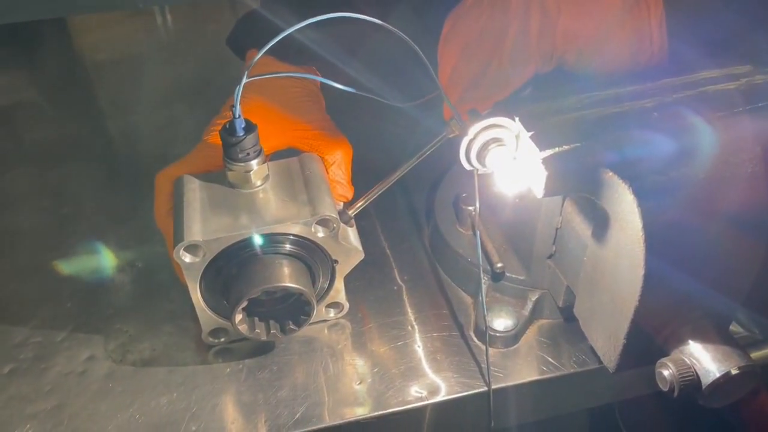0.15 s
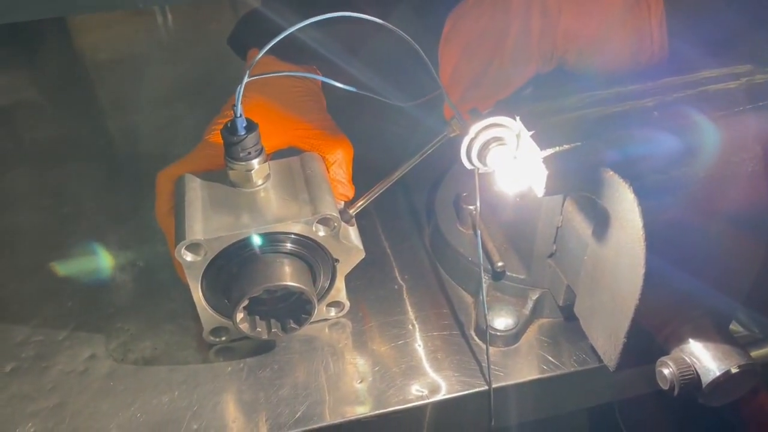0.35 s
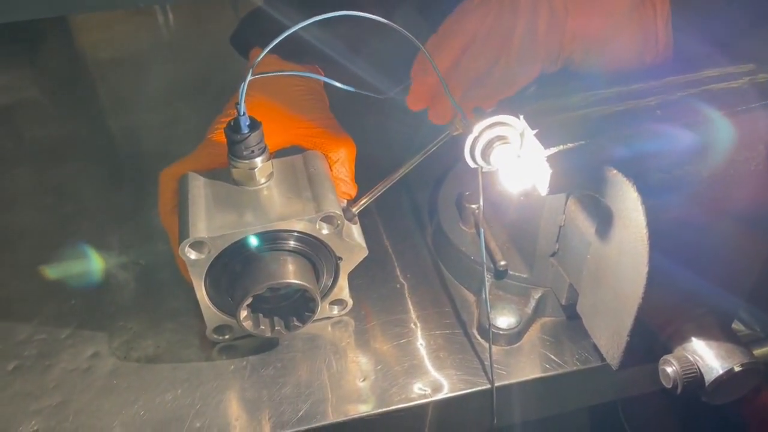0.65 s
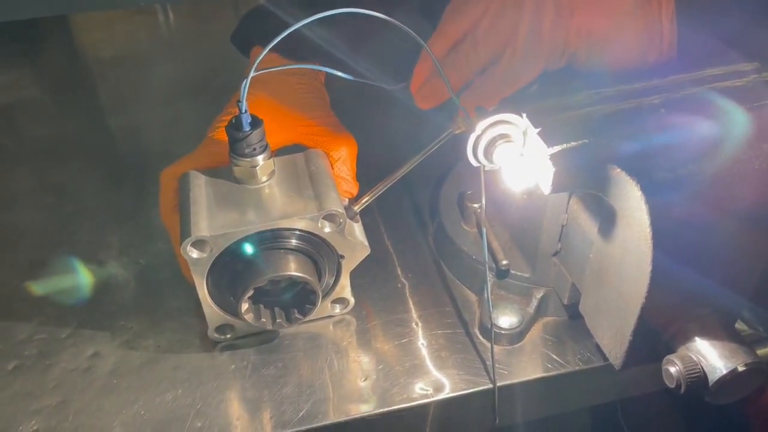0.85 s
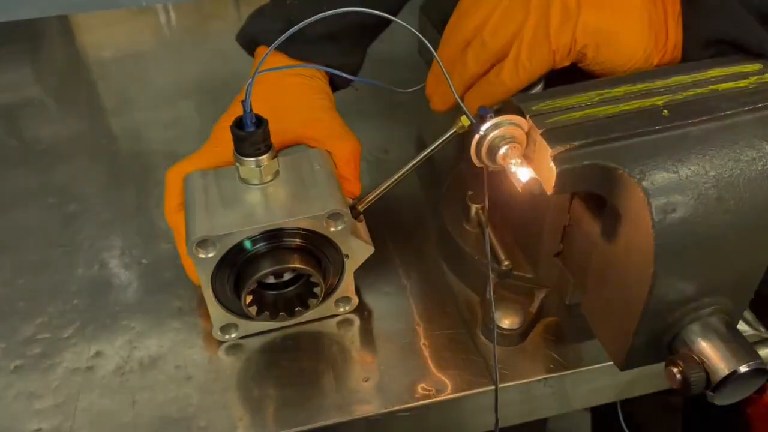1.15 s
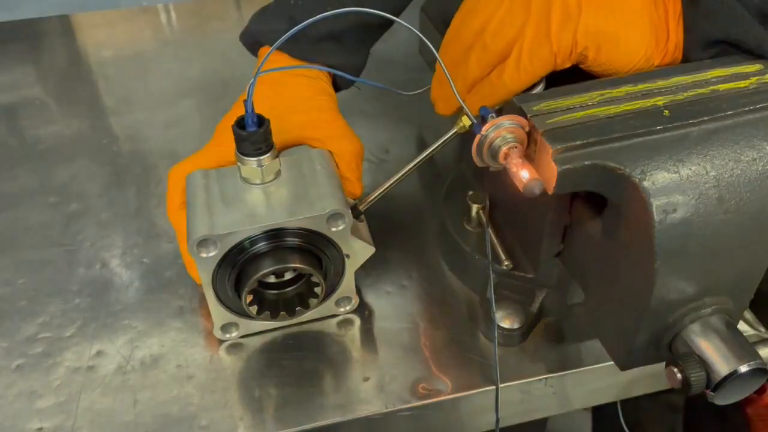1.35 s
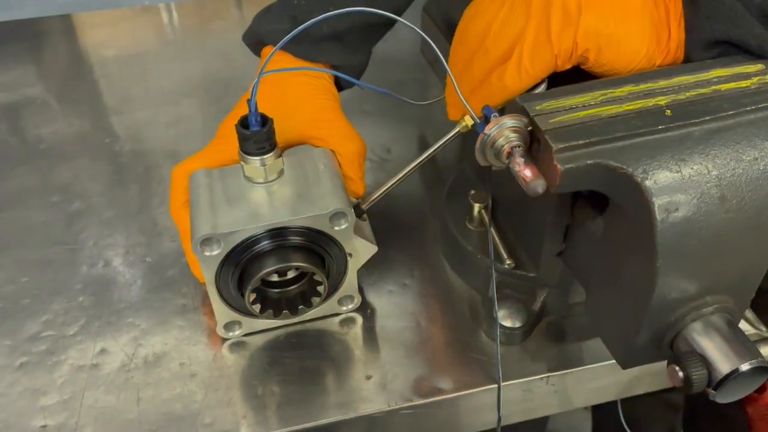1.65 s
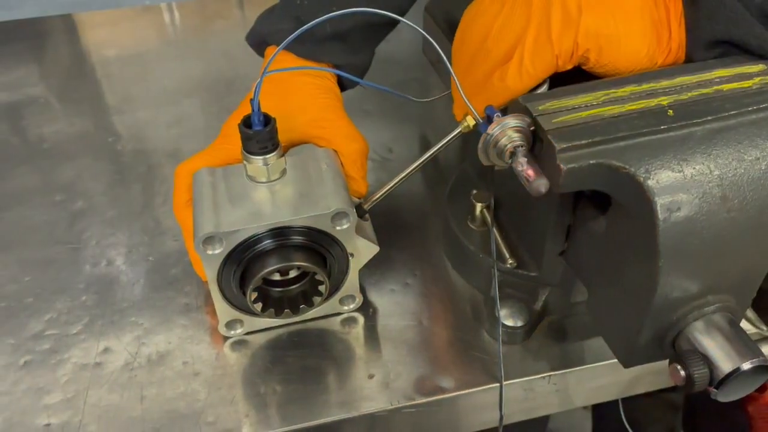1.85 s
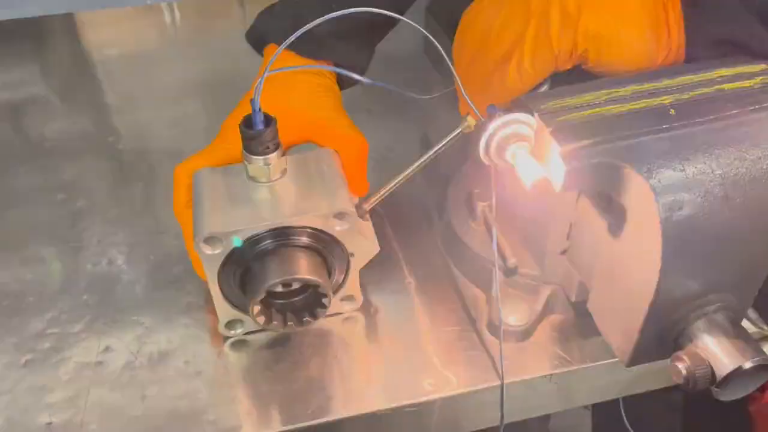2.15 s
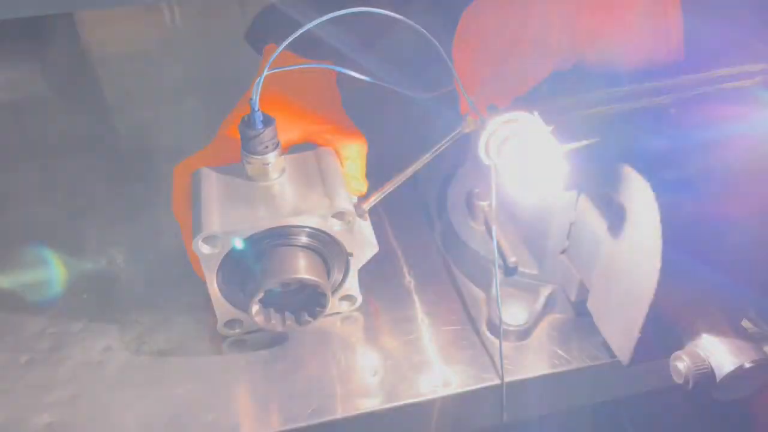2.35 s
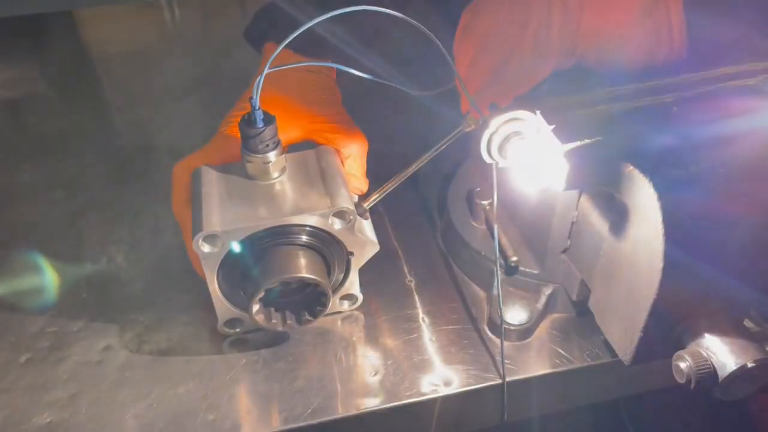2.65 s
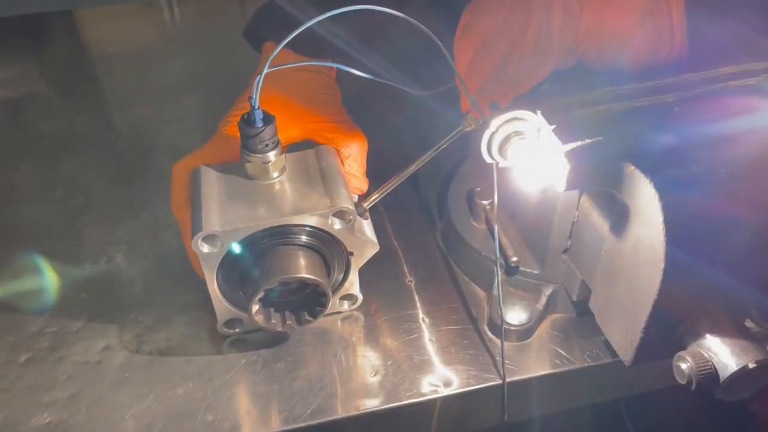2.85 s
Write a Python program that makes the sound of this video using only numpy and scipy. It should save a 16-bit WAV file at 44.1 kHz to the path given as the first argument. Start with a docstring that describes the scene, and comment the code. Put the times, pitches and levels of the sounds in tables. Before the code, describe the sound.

Bright air hiss fades to a thin leak, then returns suddenly with a knock and metallic clack

```python
"""On a workshop bench, compressed air hisses through a small steel actuator, dies away in two steps and
leaves a thin leak. After a second the valve reopens: the hiss bursts back, and at once the piston knocks,
rattles along its bore and hits its stop with a sharp click. The bench thuds; the workshop rumbles and
hums faintly. The hisses and rumble are coloured noise, the hum is a wandering sine, the slide is many tiny
slips, and the blows ring the resonances of metal and bench, with a burst of noise on the clicks."""
import sys
import numpy as np
from scipy import signal
from scipy.fft import rfft, irfft
from scipy.io import wavfile
from scipy.ndimage import uniform_filter1d

SR = 44100
rng = np.random.default_rng(int(sys.argv[2]) if len(sys.argv) > 2 else 0)


def waveform_to_disk(signal):
    """Save audio, clipped to [-1, 1], as 16-bit WAV at the path in sys.argv[1]."""
    frames = np.transpose(np.atleast_2d(signal))
    scaled = np.clip(frames, -1, 1) * 32767
    samples = np.round(scaled).astype(np.int16)
    wavfile.write(sys.argv[1], SR, samples)


N = 132300
TIME = np.arange(N) / SR  # seconds
HZ = np.maximum(np.arange(N // 2 + 1) * SR / N, 1)  # frequency of each step of the spectrum


def from_db(db):
    """Turn decibels into a gain."""
    return 10 ** (np.asarray(db) / 20)


def rms_one(x):
    """Scale a sound to an average (RMS) level of 1."""
    return x / np.sqrt(np.mean(x ** 2) + 1e-20)


def in_time(rows):
    """Join the rows of a curve by straight lines."""
    s, *columns = np.transpose(rows)
    return [np.interp(TIME, s, column) for column in columns]


def in_pitch(hz, column):
    """Join values by straight lines over the logarithm of frequency."""
    return np.interp(np.log(HZ), np.log(hz), column)


def low_pass(x, hz):
    """Cut the treble gently above a frequency."""
    return signal.sosfilt(signal.butter(2, min(hz, SR * .45), fs=SR, output="sos"), x)


def drift(rate):
    """Wander slowly at random, with spread 1; a higher rate in Hz wanders faster."""
    noise = rfft(rng.standard_normal(N))
    return rms_one(irfft(noise / (1 + (HZ / rate) ** 2), N))


def pair(table):
    """Gain and phase, by frequency, of a source in the left and right channels."""
    hz, _, pan_db, phase, _ = np.transpose(table)
    pan_db, phase = in_pitch(hz, pan_db), in_pitch(hz, phase)
    return np.array([from_db(pan_db / 2), from_db(-pan_db / 2) * np.exp(1j * phase)])


def turbulence(table):
    """Spectrum of a flow noise, partly shared by the two channels and partly separate."""
    hz, db, _, _, alike = np.transpose(table)
    db, alike = in_pitch(hz, db), in_pitch(hz, np.clip(alike, 0, 1))
    white = rfft(rng.standard_normal((3, N)))
    shared = np.sqrt(alike) * white[0]
    separate = np.sqrt(1 - alike) * white[1:]
    return (shared + separate) * from_db(db) * pair(table)


# echoes off bench and machine parts: longest delay in seconds, level of all together in dB
ECHO_S, ECHO_DB = .02, -12.5


def near_echoes(count):
    """Close reflections add to the direct sound and ripple the colour of a hiss."""
    delays = rng.uniform(ECHO_S / 10, ECHO_S, count)
    echoes = np.exp(-2j * np.pi * delays[:, None] * HZ).sum(axis=0)
    return 1 + from_db(ECHO_DB) / np.sqrt(count) * echoes


def impulses(rows):
    """Place one single-sample pulse for each row of time and level."""
    s, db = np.transpose(rows)
    return np.bincount((s * SR).astype(int), from_db(db), N)[:N] + 1e-18


def struck(rows, modes, vary_db):
    """Every blow rings all resonances of a body, each a little differently in level."""
    out, rows = 0, np.array(rows)
    for k, (hz, db, t60) in enumerate(modes):
        r = from_db(-60 / (t60 * SR))  # what is left of the ringing after one sample
        w = 2 * np.pi * hz / SR
        blow_db = rows[:, 1] + db + vary_db * rng.standard_normal(len(rows))
        blows = impulses(np.column_stack([rows[:, 0], blow_db]))
        ringing = signal.lfilter([0, np.sin(w)], [1, -2 * r * np.cos(w), r * r], blows)
        out = out + (-1) ** k * ringing  # neighbours start in opposite directions
    return out


def dying_noise(t60, channels):
    """Make a burst of noise that falls by 60 dB in t60 seconds."""
    t = TIME[:SR // 2]
    return rng.standard_normal((channels, len(t))) * np.exp(-np.log(1000) * t / t60)


# How loud the air jet is. Each row: time in seconds, level of the body of the hiss in dB,
# level of its treble in dB.
JET_LEVEL = [(0, -29, -30), (.44, -29, -29), (.58, -35.5, -35), (.71, -44.5, -40.5), (.98, -45.5, -37),
             (1.1, -67, -67), (2.05, -70, -55), (2.095, -30.5, -29.5), (2.2, -27, -27.5), (2.6, -28, -26.5),
             (2.69, -29.5, -29), (3.0, -30, -29.5)]
# Colour of the jet in the left and right channels. Each row: frequency in Hz, relative level per Hz in dB,
# left over right in dB, phase of the right in radians, likeness of the two from 0 to 1.
JET_COLOUR = [(600, -34.0, 1, -0.4, 0.54), (1450, -24.5, 0, 0.0, 0.96), (1900, -24.0, 1, -0.2, 0.76),
              (2850, -9.0, 0, -1.2, 0.76), (3500, -6.0, 1, -2.3, 0.79), (4000, -7.5, 3, -0.9, 0.65),
              (4500, -4.5, 3, -0.8, 0.77), (4850, -7.5, 3, -3.4, 0.3), (5250, 0.0, 4, -2.8, 0.84),
              (5800, -0.5, 5, -3.4, 0.88), (6350, -4.0, -5, -5.1, 0.78), (7000, -8.5, -4, -4.5, 0.69),
              (7500, -11.5, -3, -3.9, 0.66), (7850, -15.0, 0, -3.3, 0.84), (8600, -19.0, 0, -3.1, 0.97),
              (9100, -13.5, 0, -2.2, 0.66), (9900, -11.5, 0, -1.5, 0.72), (10550, -13.5, 0, -0.3, 0.75),
              (11300, -7.5, 0, 0.0, 0.97), (11900, -8.0, 0, 0.1, 0.96), (12800, -10.0, 0, 1.1, 0.74),
              (13500, -9.0, 0, 1.9, 0.77), (14650, -11.5, 0, 3.0, 0.95), (15400, -11.0, 0, 3.1, 0.97)]
# Half-whistling resonances of the air passages. Each row: frequency in Hz, width in Hz,
# lift in dB before the broad average is taken off.
PASSAGES = [(2960, 80, 3.5), (3265, 35, 4.5), (3440, 120, 2.5), (4070, 70, 4), (4486, 28, 10),
            (4548, 35, 4), (5200, 110, 2), (5325, 40, 5), (5800, 120, 1.5), (6260, 50, 3), (11485, 90, 3.5)]
TREBLE_FROM_HZ = 7140
JET_FLUTTER_DB, FLUTTER_HZ = 0.56, 37  # spread and rate of the unsteadiness


def jet():
    """Air rushes through the passages; as the flow drops the treble outlasts the body of the hiss."""
    lift_db = sum(db / (1 + (2 * (HZ - hz) / width) ** 2) for hz, width, db in PASSAGES)
    ripple_db = lift_db - uniform_filter1d(lift_db, size=1200)  # leaves the broad colour alone
    bass_cut = 1 / np.sqrt(1 + (300 / HZ) ** 4)
    air = turbulence(JET_COLOUR) * from_db(ripple_db) * near_echoes(count=16) * bass_cut
    body_share = 1 / (1 + (HZ / TREBLE_FROM_HZ) ** 6)
    body = rms_one(irfft(air * body_share, N))
    treble = rms_one(irfft(air * (1 - body_share), N))
    body_db, treble_db = in_time(JET_LEVEL)
    hiss = from_db(body_db) * body + from_db(treble_db) * treble
    return hiss * from_db(JET_FLUTTER_DB * drift(FLUTTER_HZ))


# The leak sinks, then grows as pressure builds behind the shut valve.
# Each row: time in seconds, level in dB.
LEAK_LEVEL = [(0, -46.5), (1.3, -51), (1.8, -45.5), (2.1, -45.5), (2.3, -47)]
# Colour of the leak in the left and right channels. Each row: frequency in Hz, relative level per Hz in dB,
# left over right in dB, phase of the right in radians, likeness of the two from 0 to 1.
LEAK_COLOUR = [(600, -10.0, 1, -0.3, 0.42), (1300, -7.0, 2, 0.5, 0.69), (2700, -8.5, 1, -0.1, 0.85),
               (3600, -3.0, 0, 0.0, 0.97), (4300, -8.5, 0, -0.0, 0.87), (5200, -7.0, -2, -0.0, 0.33),
               (5700, -4.5, -2, 1.2, 0.45), (6300, 0.0, 0, 0.5, 0.87), (7000, -2.0, 0, 0.5, 0.74),
               (7750, -7.0, 0, 3.1, 0.96), (8400, -2.5, 0, 3.3, 0.9), (9300, -5.0, 0, 4.3, 0.71),
               (10900, -3.0, 0, 6.0, 0.85), (11900, -7.0, 0, 6.3, 0.97), (13400, -7.0, 0, 8.1, 0.64),
               (14650, -3.0, 0, 9.4, 0.97), (15400, -6.5, 0, 9.4, 0.97)]
LEAK_FLUTTER_DB = 0.6


def leak():
    """A thin, slightly unsteady hiss of escaping air goes on while the valve is shut."""
    db, = in_time(LEAK_LEVEL)
    hiss = rms_one(irfft(turbulence(LEAK_COLOUR) * near_echoes(count=16), N))
    return from_db(db + LEAK_FLUTTER_DB * drift(FLUTTER_HZ)) * hiss


# Colour of the workshop air. Each row: frequency in Hz, relative level per Hz in dB,
# left over right in dB, phase of the right in radians, likeness of the two from 0 to 1.
RUMBLE_COLOUR = [(20, -31, -2, 0, .95), (32, -15, -2, 0, 0.9), (48, 2.5, -2.5, 0, .96),
                 (81, -2.5, -2, 0, 1), (121, -10, -4, 0, 0.79), (250, -12.5, -1.5, 0, 0.83),
                 (426, -19, 0.5, 0, 0.72), (1010, -24, 3.5, 0, 0.44), (3180, -37, 0, 0, 0.6)]
RUMBLE_DB = -52.5


def rumble():
    """The workshop air rumbles steadily, as noise that is strongest in the bass."""
    return from_db(RUMBLE_DB) * rms_one(irfft(turbulence(RUMBLE_COLOUR), N))


# A faint hum sinks in pitch as the air dies away. Each row: time in seconds, pitch in Hz, level in dB.
HUM = [(.7, 200, -76), (.98, 192, -58), (1.14, 169, -63.5), (1.33, 157.4, -60), (1.7, 155, -60.5),
       (2.1, 155, -57), (2.45, 155, -63), (2.6, 155, -79)]


def hum():
    """A sine tone sinks and lingers while the air is off, wavering in pitch and level."""
    hz, db = in_time(HUM)
    wavering_hz = hz + 1.4 * drift(4.7)
    tone = np.sqrt(2) * np.sin(2 * np.pi * np.cumsum(wavering_hz) / SR)
    return from_db(db + 0.82 * drift(6)) * tone


# Light dry ticks. Each row: time in seconds, level in dB.
TICKS = [(.8405, -41), (.8435, -40), (1.6092, -35.5), (1.6135, -46)]
# How a tick rings. Each row: frequency in Hz, relative level in dB, time to fall by 60 dB in seconds.
TICK_MODES = [(1370, -7.5, 0.016), (2300, -5, 0.0068), (3460, -2.5, 0.0054), (4770, -3, 0.0051),
              (6230, 3.5, .009), (10200, -10, .006)]


def ticks():
    """Each light tick rings a few resonances that die within milliseconds."""
    return struck(TICKS, TICK_MODES, vary_db=0.3)


# The piston slides back gently, then forward hard. Each row: middle in seconds,
# half length in seconds, level in dB.
STROKES = [(.972, 0.033, -55.5), (2.136, 0.04, -33.5)]
SLIDE_LOW_HZ, SLIDE_TOP_HZ, SLIPS_PER_S = 91, 1560, 2500


def slide():
    """Dense little slips at random moments make the scrape while the piston travels."""
    slips = (rng.random(N) < SLIPS_PER_S / SR) * rng.standard_normal(N) + 1e-18
    scrape = rms_one(low_pass(slips, SLIDE_TOP_HZ) - low_pass(slips, SLIDE_LOW_HZ))
    stroke = sum(from_db(db) * np.exp(-((TIME - s) / half) ** 4) for s, half, db in STROKES)
    return stroke * scrape


# The piston knocks in its bore. Each row: time in seconds, level in dB.
KNOCKS = [(.9497, -39), (.9655, -39), (.979, -49), (2.0995, -28), (2.1062, -11.5), (2.1203, -23),
          (2.1255, -28), (2.1665, -23)]
# How the piston rings. Each row: frequency in Hz, relative level in dB, time to fall by 60 dB in seconds.
PISTON = [(716, -21, .018), (950, -21.5, 0.024), (1090, -13.5, 0.028), (1202, 0.5, .02),
          (1370, -6.5, 0.018), (1990, -12.5, 0.019), (2150, -18, 0.028), (3340, -18, .012)]


def knocks():
    """Each knock makes the piston ring briefly at its own resonances."""
    return struck(KNOCKS, PISTON, vary_db=2.3)


# The bench takes the recoil. Each row: time in seconds, level in dB.
THUDS = [(.985, -49), (2.106, -31), (2.126, -40), (2.1475, -27), (2.178, -37)]
# How the bench rings. Each row: frequency in Hz, relative level in dB, time to fall by 60 dB in seconds.
BENCH = [(120, -9.5, .12), (195.2, -3, .19), (223, -5, 0.096), (309, -1.5, 0.16), (525, -9, 0.046),
         (790, -10, 0.037)]
BENCH_PAN_DB = -1.2  # left over right


def bench_thuds():
    """The recoil of the blows rings the low resonances of the bench."""
    return struck(THUDS, BENCH, vary_db=1.5) * from_db([[BENCH_PAN_DB / 2], [-BENCH_PAN_DB / 2]])


# Metal clicks on metal, loudest at the end stop. Each row: time in seconds, level in dB.
CLICKS = [(2.113, -25), (2.132, -23.5), (2.1413, -24), (2.1456, -7.5), (2.152, -18.5), (2.161, -24)]
# How the housing rings. Each row: frequency in Hz, relative level in dB, time to fall by 60 dB in seconds.
HOUSING = [(1220, -14.5, 0.016), (2020, -4.5, 0.025), (2145, -9, .028), (2215, -9, 0.034),
           (2440, -7.5, .024), (2800, -10.5, 0.016), (3160, -11, .02), (3913, -4, 0.022),
           (4050, -9.5, 0.022), (4690, -14.5, 0.023), (5140, -16, .012), (6300, -11.5, 0.019)]
CRACK_DB, CRACK_T60_S, CRACK_HZ = -15, 0.012, 7000  # the burst of noise in each click


def clicks():
    """Each impact of metal rings the housing and adds a short crack of noise."""
    burst = low_pass(dying_noise(CRACK_T60_S, channels=2), CRACK_HZ)
    crack = signal.fftconvolve(impulses(CLICKS)[None], burst)[:, :N]
    return struck(CLICKS, HOUSING, vary_db=0.2) + from_db(CRACK_DB) * crack


BLOW_PAN_DB = .5  # left over right, added to that of the leak
ROOM_T60_S, ROOM_DB, ROOM_TOP_HZ = 0.28, -15, 5000  # the workshop's short tail


def actuator():
    """Ticks, slide, knocks and clicks come from where the leak is, with the workshop's short tail."""
    metal = ticks() + slide() + knocks() + clicks()
    direct = irfft(rfft(metal) * pair(LEAK_COLOUR), N)
    direct = direct * from_db([[BLOW_PAN_DB / 2], [-BLOW_PAN_DB / 2]])
    tail = low_pass(dying_noise(ROOM_T60_S, channels=2), ROOM_TOP_HZ)
    tail = tail / np.sqrt(np.sum(tail ** 2) / 2)
    return direct + from_db(ROOM_DB) * signal.fftconvolve(direct, tail, axes=1)[:, :N]


def scene():
    """Add up everything heard at the bench."""
    return jet() + leak() + rumble() + hum() + actuator() + bench_thuds()


def record(dry):
    """Cut the top steeply above 15445 Hz."""
    return signal.sosfilt(signal.ellip(12, .1, 80, 15445, fs=SR, output="sos"), dry)


dry = scene()
out = record(dry)
waveform_to_disk(out)
```